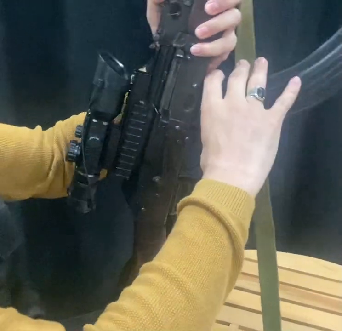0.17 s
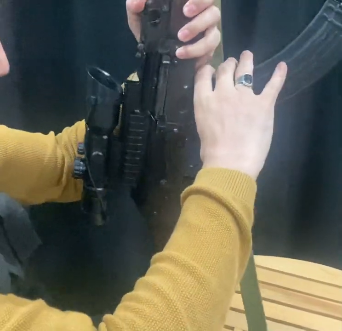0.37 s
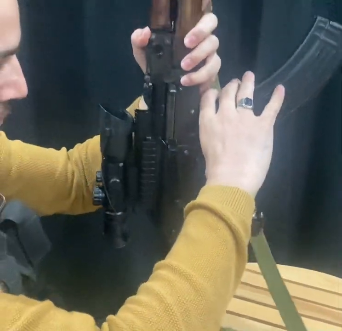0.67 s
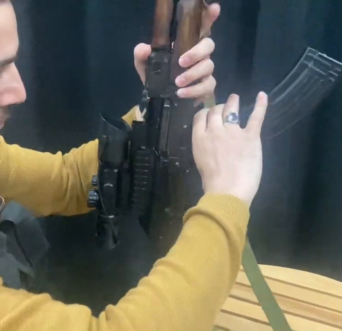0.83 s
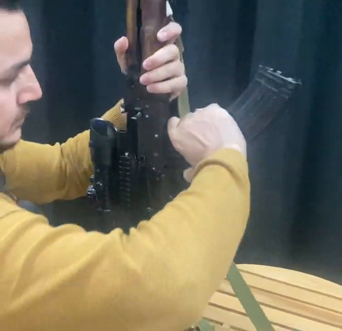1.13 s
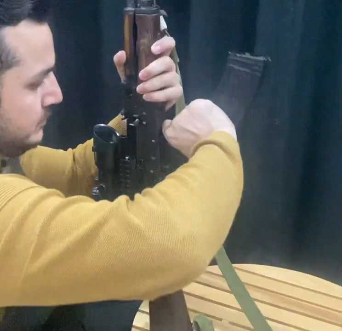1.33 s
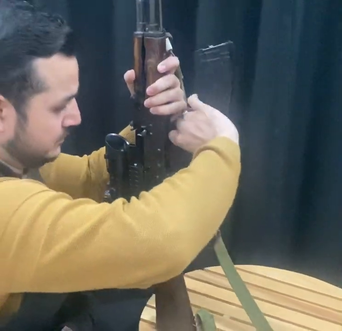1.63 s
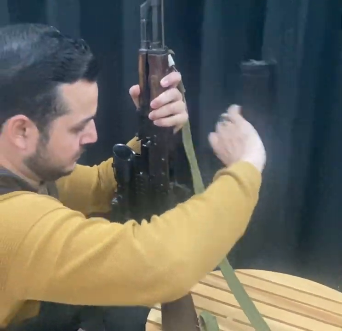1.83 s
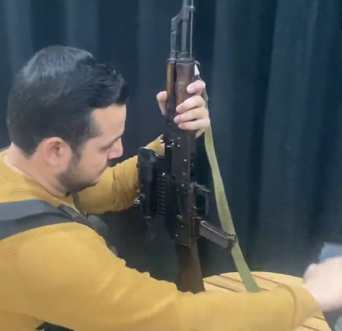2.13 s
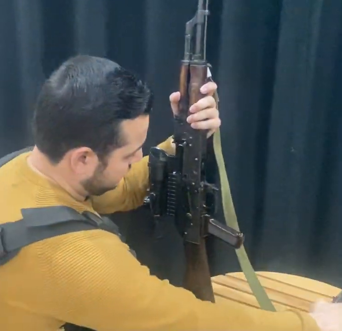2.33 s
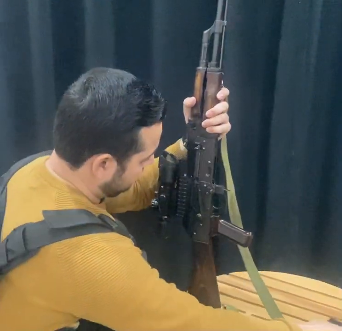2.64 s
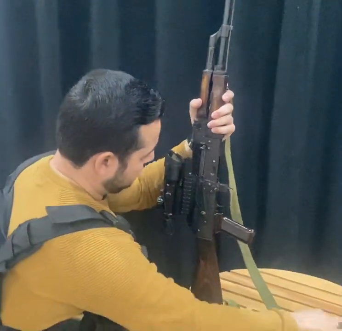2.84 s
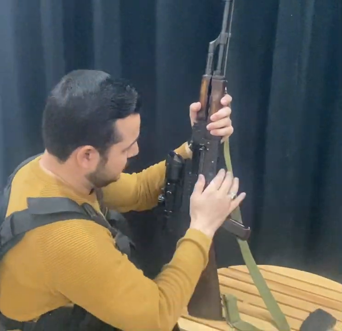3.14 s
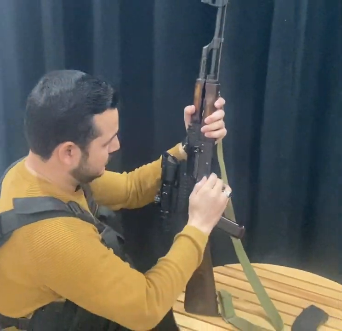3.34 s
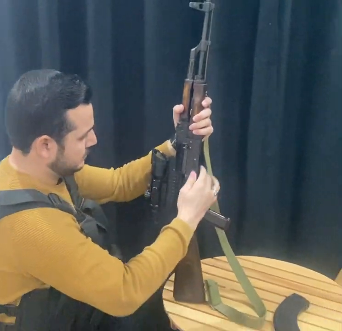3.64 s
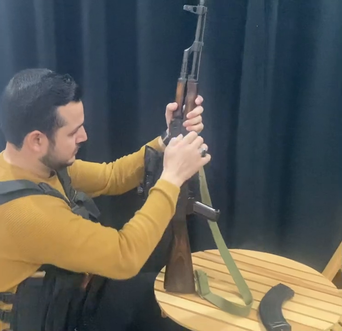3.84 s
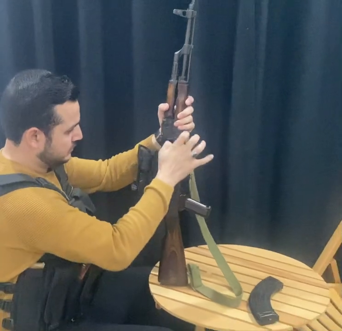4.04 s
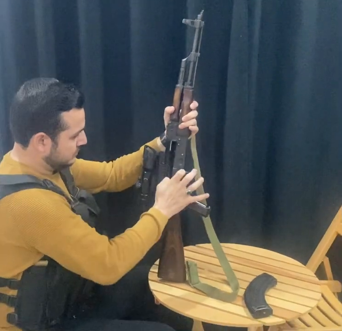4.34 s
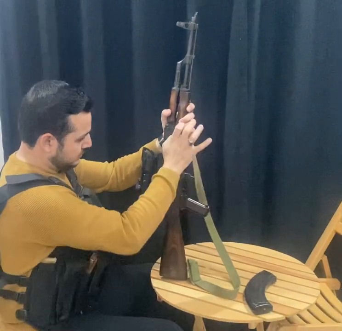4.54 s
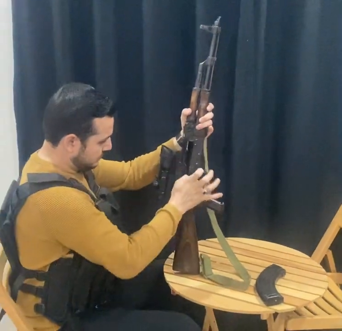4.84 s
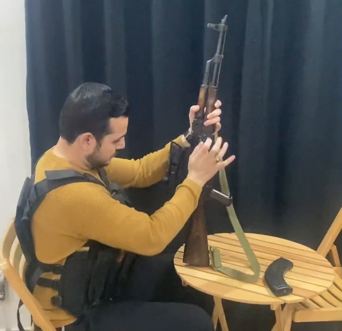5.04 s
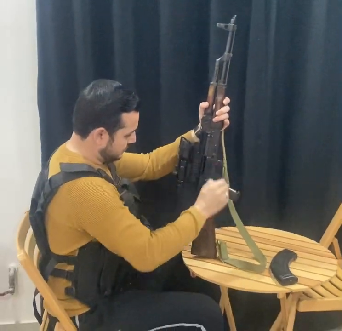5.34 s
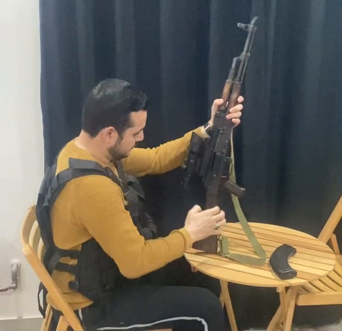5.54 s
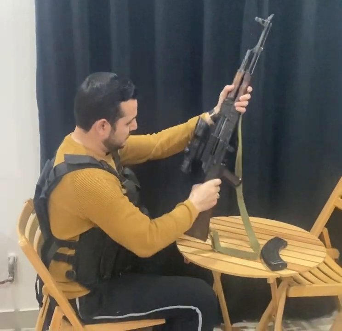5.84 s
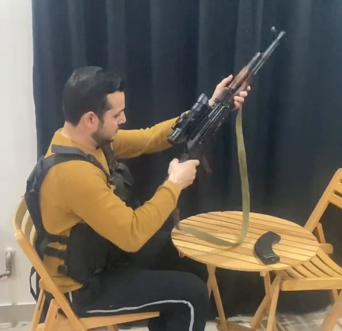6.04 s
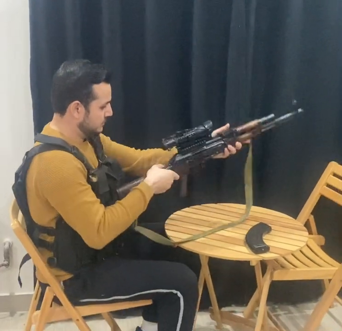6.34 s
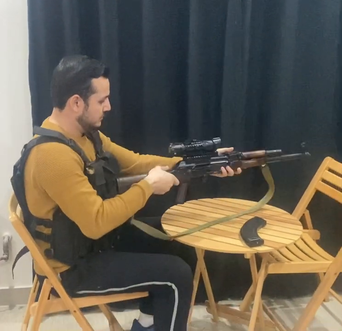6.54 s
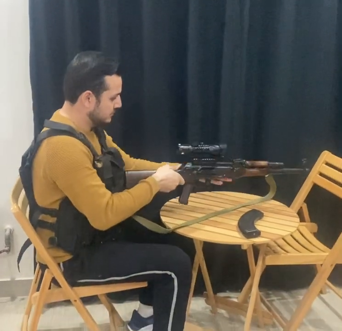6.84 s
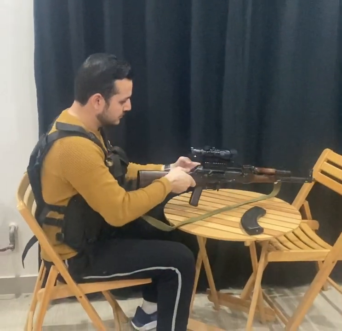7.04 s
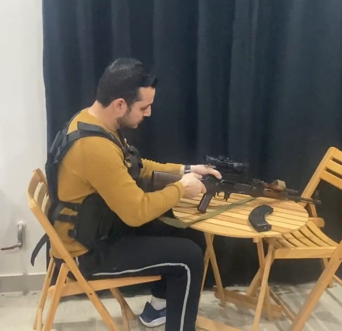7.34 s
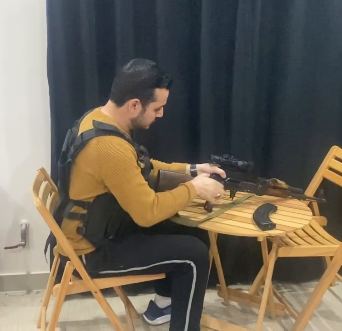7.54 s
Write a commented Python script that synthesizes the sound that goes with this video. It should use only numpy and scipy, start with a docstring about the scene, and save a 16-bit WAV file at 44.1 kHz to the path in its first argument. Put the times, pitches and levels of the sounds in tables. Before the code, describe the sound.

In a small, hard, lively room, a rifle is handled at a slatted wooden table. Faint metal ticks and sleeve rustle, a knock as the butt settles, dull magazine clunks, then the magazine is laid on wood. A crisp lever snap follows, then two loud scraping bolt pulls with ringing steel clacks, a scuff, and closing wooden knocks. Stereo microphone, slightly stronger on the left.

```python
"""In a small hard room, a rifle is cleared at a slatted wooden table.
The butt is stood on the table, the magazine unlatched and laid down, the safety lever snapped,
the bolt racked twice and the rifle lowered. Blows are short chatters of contacts that ring steel or wood;
slides, drags and the rustle of sleeves and sling are clumped, coloured grains. All but the room's
still air passes through echoes, whose level over the direct sound rises and falls through the scene."""
import sys
import numpy as np
from scipy import signal
from scipy.fft import rfft, irfft, next_fast_len
from scipy.io import wavfile

SR = 44100
rng = np.random.default_rng(int(sys.argv[2]) if len(sys.argv) > 2 else 0)


def wav_out(sig):
    """Save sig, one row per channel (or a flat mono array), as 16-bit PCM at SR to the path in sys.argv[1]."""
    wavfile.write(sys.argv[1], SR, np.round(np.clip(np.atleast_2d(sig).T, -1, 1) * 32767).astype(np.int16))


N = 339570
TIME = np.arange(N) / SR

# steel-on-steel blows with rebound: (time [s], level [dB], chatter [s], bass [dB], treble [dB],
# struck part's resonance [Hz], its gain [dB], rebound delay [s], rebound level re blow [dB])
STEEL_CLACKS = [ (.232, -39.5, .008, -3.5, -19.5, 4050, 4, 0.048, -10),
                (.635, -38, 0.0096, 3, -24.5, 1570, 8, 0.013, -5),
                (.783, -29.5, .013, 24, 1, 2000, 8, .014, -1),
                (1.268, -40.5, 0.0048, -22, 0, 920, 25, 0.012, -5),
                (1.286, -39, .005, -8, 6, 10600, -8, 0.014, -20),
                (1.357, -35, 0.0039, -2, 3, 2040, 13.5, 0.011, -8),
                (1.629, -47.5, .005, 6, -6, 1050, 20, .009, 12),
                (1.660, -35.5, .0065, 15, -7, 986, 20.5, .012, -12),
                (3.300, -55, .008, -9.5, -12.5, 1020, 20, 0.016, -8.5),
                (3.343, -19.5, 0.0013, -11, 3.5, 3550, 3, 0.0062, -12),
                (4.020, -30.5, 0.0073, -2, -4.5, 1011, 12.5, 0.045, -0.5),
                (4.111, -26, .008, -1.5, -1.5, 5320, 6, 0.014, -7.5),
                (4.166, -11, .0069, -6, 5, 2890, 4.5, .017, -3),
                (4.257, -11.5, .006, 1.5, -1, 1780, -0.5, .011, -5),
                (4.411, -31, .008, 2, 8, 1820, 0.5, .032, -3),
                (4.512, -8, .011, -5, 3, 4604, 2, .015, -2.5),
                (4.753, -19, 0.0083, -7.5, 5.5, 7280, 6.5, 0.0065, -9),
                (4.838, -13.5, .008, 2.5, -0.5, 1470, 4.5, 0.0071, -1),
                (5.030, -26, .008, 1, -6, 1150, 10, 0.011, 4),
                (5.047, -7, .0086, -2.5, 5.5, 3360, -0.5, 0.0079, -8.5),
                (5.809, -42, 0.028, 4, -6.5, 1300, 7, 0.052, -6)]
# magazine rocking in its well, damped by the hand: (time [s], level [dB], chatter [s], bass [dB],
# treble [dB], resonance [Hz], its gain [dB])
MAGAZINE_CLUNKS = [(0.992, -51, .002, -23, 17, 2010, 2), (1.042, -45, 0.00078, -7, -7, 1670, 2),
                   (1.328, -35.5, 0.0033, -11, 3, 960, 13), (1.490, -28, 0.0017, 5, 4.5, 1360, -1)]
# broad colour of the steel: (frequency [Hz], density [dB per Hz])
STEEL_SPECTRUM = [(35, -42), (80, -19.5), (130, -7.5), (230, -7), (330, -11), (540, -11), (700, -4),
                  (1000, -1.5), (2000, 3), (4700, 0), (6000, -5), (7200, -1.5), (8600, -9.5), (10200, 0.5),
                  (12000, -0.5), (16000, -8.5)]
# nominal ringing modes of the steel: (frequency [Hz], relative level [dB], t60 [s])
STEEL_RING = [(1088, -2.5, .14), (1120, -0.5, 0.14), (1492, -1, 0.18), (1763, -4, 0.13), (1890, -4, 0.6),
              (2130, 1.5, 0.17), (2460, -6, 0.092), (2750, 2, 0.31), (3010, -0.5, 0.15), (3630, -4, 0.069),
              (4120, -5.5, 0.15), (4030, -7, 0.22), (5020, 1.5, 0.33), (5240, -7, .16), (7520, -3, 0.25),
              (9740, 0, .12)]


def amp(db):
    """Decibels to gain."""
    return 10 ** (np.asarray(db) / 20)


def unit(x):
    """Scales to an energy of one."""
    return x / np.sqrt(np.sum(x ** 2) + 1e-20)


def read(points, hz):
    """Reads a spectrum on a log-frequency axis."""
    f, value = np.transpose(points)
    return np.interp(np.log(hz + 1), np.log(f + 1), value)


def follow(points):
    """Reads a time curve at every sample."""
    return np.interp(TIME, *np.transpose(points))


def add(mix, s, sound):
    """Mixes a sound in at time s."""
    part = mix[round(s * SR):][:len(sound)]
    part += sound[:len(part)]


def colour(points, size=4096):
    """Causal, minimum-phase impulse response with the given spectrum."""
    log_gain = np.log(amp(read(points, abs(np.fft.fftfreq(size, 1 / SR)))))
    response = np.exp(np.conj(signal.hilbert(log_gain)))
    return np.fft.ifft(response).real[:size // 2]


def tint(x, points):
    """Filters a sound by a spectrum."""
    return signal.oaconvolve(x, colour(points))[:len(x)]


def resonate(x, hz, width_hz):
    """A resonance with a peak gain of one."""
    return signal.lfilter(*signal.iirpeak(hz, hz / width_hz, fs=SR), x)


def grains(count, per_s, spread_db):
    """Tiny contacts of uneven size and random sign at random moments."""
    size = amp(spread_db * np.minimum(rng.exponential(1, count), 4))
    return size * rng.choice([-1, 1], count) * (rng.random(count) < per_s / SR)


def stroke(start_s, length_s, attack_s, release_s, swell_db):
    """Gain of one rubbing movement: it sets in, swells or sags while it lasts, and dies away."""
    t = TIME - start_s
    attack = np.clip(t / attack_s, 0, 1)
    swell = amp(swell_db * (np.clip(t / length_s, 0, 1) - .5))
    release = np.exp(-np.clip((t - length_s) / release_s, 0, 20))
    return attack * swell * release


def rub(spectrum, per_s, spread_db, lumpy_db, lump_s=0.01):
    """Friction at unit RMS: clumps of tiny slips, coloured by the thing that is rubbed."""
    knots_s = np.arange(N // 64) * lump_s
    pressure = amp(lumpy_db * np.interp(TIME, knots_s, rng.standard_normal(len(knots_s))))
    slips = grains(N, per_s, spread_db) * pressure
    return unit(tint(slips, spectrum)) * np.sqrt(N)


def strike(rows, spectrum, modes, ring_db, first_s, detune=0.025, width=0.12, size=16384):
    """Each blow is one hard contact and a short chatter of loose parts, which set the body ringing."""
    t, out = np.arange(size) / SR, np.zeros(N)
    hz, mode_db, t60_s = np.transpose(modes)[:, :, None]
    fades = amp(mode_db - 60 * t / t60_s)
    crack = unit(tint(signal.unit_impulse(size), spectrum))
    for s, level_db, chatter_s, bass_db, treble_db, part_hz, part_db in rows:
        contact = unit(grains(size, 12000, 3.6) * np.exp(-.5 * (t / chatter_s) ** 2))
        contact[0] += first_s / chatter_s  # the longer the chatter, the less its first contact stands out
        grip = 1 + detune * rng.standard_normal(hz.shape)  # hands and moving parts shift the modes
        ring = rng.choice([-1, 1], len(modes)) @ (fades * np.sin(2 * np.pi * hz * grip * t))
        hit = signal.fftconvolve(contact, crack + amp(ring_db) * unit(ring))[:size]
        hit = tint(hit, [(350, bass_db), (1500, 0.011), (2500, 0.0019), (9000, treble_db)])
        # the struck part lends its own broad resonance
        hit = hit + (amp(part_db) - 1) * resonate(hit, part_hz, width * part_hz)
        add(out, s, amp(level_db) * unit(hit) * np.sqrt(SR / 100))  # level as if packed into 10 ms
    return out


def rebounding(rows, longer, heavier_db, duller_db, body_hz, body_db):
    """Each blow makes two contacts; the second is longer, heavier and duller, and sounds the whole body."""
    contacts = []
    for s, level_db, chatter_s, bass_db, treble_db, part_hz, part_db, after_s, second_db in rows:
        contacts.append((s, level_db, chatter_s, bass_db, treble_db, part_hz, part_db))
        contacts.append((s + after_s, level_db + second_db, chatter_s * longer,
                         bass_db + heavier_db, treble_db - duller_db, body_hz, body_db))
    return contacts


def diffuse(pair):
    """Two unrelated signals become a diffuse field at two close ports: alike mainly in the bass."""
    # left-right correlation: (frequency [Hz], correlation [1])
    correlation = [(60, .985), (140, .965), (270, .8), (550, .28), (1200, 0), (3000, 0), (7000, .15),
                   (12000, -.1)]
    alike = read(correlation, np.fft.rfftfreq(pair.shape[1], 1 / SR))
    mid, side = rfft(pair) * np.sqrt([(1 + alike) / 2, (1 - alike) / 2])
    return irfft([mid + side, mid - side], pair.shape[1])


def walls(early_db=-3, build_s=0.0052, count=2400):
    """One set of echoes: a few near reflections, and a tail whose treble dies first."""
    # decay of the tail: (frequency [Hz], t60 [s])
    decay = [(100, 0.58), (260, .6), (700, 0.36), (1840, 0.39), (4850, 0.38), (12800, 0.26)]
    # colour of the echoes: (frequency [Hz], gain [dB])
    echo_spectrum = [(50, 3.5), (100, -0.5), (128, 6.5), (165, -1), (220, 0), (320, 0.5), (3000, 0.5),
                     (7000, 1.5), (12000, -6.5), (16000, -13)]
    taps, early = np.zeros((2, 2, count * 16))
    at = np.arange(count) * 16 + rng.integers(0, 16, (2, count))  # one tap in every 16 samples
    np.put_along_axis(taps, at, rng.choice([-1., 1.], at.shape), 1)
    hz, t, z = signal.stft(diffuse(taps), SR, nperseg=256)
    fade = amp(-60 * t / read(decay, hz)[:, None]) * (1 - np.exp(-t / build_s))
    tail = unit(signal.istft(z * fade, SR, nperseg=256)[1][:, :taps.shape[1]])
    near = rng.integers(SR // 2000, SR // 100, (2, 14))  # 0.5 to 10 ms
    np.put_along_axis(early, near, rng.uniform(-1, 1, near.shape), 1)
    echoes = np.sqrt(2) * unit(tail + amp(early_db) * unit(diffuse(early)))
    return np.array([tint(side, echo_spectrum) for side in echoes])


def room(x, lag_s=.000023, cycle_hz=23, count=3):
    """Direct sound at two ports, plus echoes that cycle through three random tails at a fixed rate."""
    # room over direct sound, rising and falling through the scene: (time [s], ratio [dB])
    echo_ratio = [(0, 5), (1.5, 1.5), (2.6, 9), (3.3, 5.5), (4.2, 2), (5, 2.5), (7.7, 9.5)]
    wet = amp(follow(echo_ratio))
    direct = x / np.hypot(1, wet)
    size = next_fast_len(N)
    # the right port is a little farther away
    later = np.exp(-2j * np.pi * np.fft.rfftfreq(size, 1 / SR) * lag_s)
    out = np.array([direct, irfft(rfft(direct, size) * later, size)[:N]])
    for k in range(count):
        # the squares sum to one and repeat at cycle_hz
        share = np.sqrt(2 / count) * np.cos(np.pi * (cycle_hz * TIME + k / count))
        out += signal.oaconvolve((direct * wet * share)[None], walls(), axes=1)[:, :N]
    return out


def hush(level_db=-68.5):
    """The still air of the room: steady, coloured, diffuse noise."""
    # (frequency [Hz], density [dB per Hz])
    air_spectrum = [(15, -34.5), (25, -7), (87, 4), (575, -10.5), (911, -6.5), (2160, -8), (5570, -22),
                    (7110, -18.5), (8590, -29), (11000, -19.5), (11900, -25.5), (13200, -53.5),
                    (16000, -51.5)]
    air = diffuse(np.array([tint(side, air_spectrum) for side in rng.standard_normal((2, N))]))
    return amp(level_db) * unit(air) * np.sqrt(2 * N)


def clothes(attack_s=0.036, release_s=0.017, swell_db=-6.5, rest_db=-76.5):
    """Each movement crumples the sleeves; vest and sling add a brighter swish."""
    # arm movements: (start [s], length [s], level [dB], swish re crumple [dB])
    movements = [(0.252, .20, -66, -17), (0.667, 0.34, -58, -5), (1.053, 0.26, -63.5, -1.5),
                 (1.218, 0.21, -55.5, -13), (1.677, 0.18, -58, -8), (1.85, 0.18, -63, -20),
                 (2.257, 0.081, -60.5, -23), (2.724, 0.29, -56, -13), (3.126, 0.071, -66, -9),
                 (3.277, .20, -58, -1), (5.718, 0.36, -65, 0), (6.149, 0.24, -65.5, 8),
                 (6.63, .25, -82, 12), (6.916, 0.25, -70.5, 3.5), (7.22, 0.54, -70, -9)]
    # colour of the cloth: (frequency [Hz], density [dB per Hz])
    cloth_spectrum = [(35, -36), (60, -2.5), (189, -0.5), (380, -6), (408, -3), (515, -5), (666, -3),
                      (842, -3.5), (4030, -13), (5590, -25), (11000, -24), (13600, -37.5), (16000, -38)]
    crumple = rub(cloth_spectrum, per_s=2500, spread_db=2.5, lumpy_db=6.5)
    swish = rub(cloth_spectrum, per_s=6400, spread_db=7.0, lumpy_db=5.5)
    swish = tint(swish, [(1500, -21.5), (6000, 4.5), (12000, 6)])
    moving = np.zeros(N)
    for s, length_s, level_db, swish_db in movements:
        effort = amp(level_db) * stroke(s, length_s, attack_s, release_s, swell_db)
        moving += effort * (crumple + amp(swish_db) * swish)
    return moving + amp(rest_db) * crumple  # between movements the cloth is almost still


def butt_drag(attack_s=0.016, release_s=0.03, swell_db=4):
    """The butt judders over the slats in two scuffs as it leaves the tabletop."""
    # (start [s], length [s], level [dB])
    scuffs = [(5.407, 0.05, -45.5), (5.531, 0.052, -53)]
    # (frequency [Hz], density [dB per Hz])
    scuff_spectrum = [(50, -14), (130, -0.5), (280, -2), (420, -10), (750, -13), (1100, -14), (1300, -4.5),
                      (1550, -11), (1900, -2), (2300, -14), (2850, -6), (3250, -22), (6000, -33),
                      (16000, -29)]
    push = sum(amp(level_db) * stroke(s, length_s, attack_s, release_s, swell_db)
               for s, length_s, level_db in scuffs)
    return push * rub(scuff_spectrum, per_s=1200, spread_db=-2.0, lumpy_db=-3.0)


def tabletop(thump_after_s=.012, thump_db=-13.5):
    """The table takes the rifle and the magazine, and thumps when the magazine rocks in the standing rifle."""
    # an edge lands, then the weight: (time [s], level [dB], chatter [s], bass [dB], treble [dB],
    # struck spot's resonance [Hz], its gain [dB], weight's delay [s], weight's level re blow [dB])
    landings = [ (.772, -22.5, 0.006, -1, 5.5, 3150, 5.5, .003, -2.5),
                (2.529, -34.5, 0.0099, 12, 2, 1100, 14.5, .014, -4),
                (2.570, -41.5, .025, 4.5, -8, 338, 10.5, 0.034, -7),
                (2.762, -23.5, 0.013, -7, 2, 2700, 1.5, .012, -4.5),
                (2.772, -26.5, 0.014, 3, -14.5, 217, 15, .012, -11.5),
                (5.436, -32, 0.0059, 35, -23, 172, 12, .018, -4.5),
                (6.200, -45.5, 0.0096, -5, -9, 1900, 11, .012, -11),
                (6.205, -46, 0.0088, -5, -8, 440, 22, .02, -15),
                (7.328, -39.5, .012, 10, 10, 436, 11.5, .012, -9),
                (7.349, -23, 0.0083, -5.5, 13, 2480, -8, .014, -1.5),
                (7.373, -17, 0.0078, -8.5, 9, 852, 12.5, .006, -14),
                (7.412, -28, 0.0044, -6, 1.5, 877, -2, .012, -7),
                (7.460, -36.5, 0.032, -4, 9, 398, 11.5, .03, -9)]
    # (frequency [Hz], density [dB per Hz])
    wood_spectrum = [(30, -49.5), (70, -8.5), (100, -4), (125, -2.5), (240, 4.5), (380, -7.5), (560, -3),
                     (900, -6), (1300, -4.5), (2200, -6), (3500, -11), (5500, -26.5), (8500, -36.5),
                     (11000, -33.5), (16000, -39)]
    # nominal: (frequency [Hz], relative level [dB], t60 [s])
    wood_ring = [(127.2, -12, 0.49), (203.1, -0.5, .3), (229.2, -7, 0.2), (252.3, -8.5, 0.78),
                 (326, 1.5, 0.32), (449.5, 0.5, 0.29), (930, 8.5, 0.14), (950, 1.5, 0.12),
                 (1574, -6.5, 0.14), (2160, 2.5, 0.31), (2730, -1.5, 0.23), (3010, -20, .1)]
    knocks = rebounding(landings, longer=1.23, heavier_db=5.5, duller_db=8.5, body_hz=211.5, body_db=5)
    # each clunk runs down the stock; chatter s, bass dB, treble dB, resonance Hz and its dB are shared
    thumps = [(s + thump_after_s, level_db + thump_db, 0.0086, 17, -18, 199, 25)
              for s, level_db, *_ in MAGAZINE_CLUNKS]
    return strike(knocks + thumps, wood_spectrum, wood_ring, ring_db=-11, first_s=0.0011, detune=.015)


def magazine_rock():
    """The magazine clunks in its well, with short, hand-damped modes."""
    # (frequency [Hz], density [dB per Hz])
    magazine_spectrum = [(60, -58.5), (220, -29), (350, -13.5), (550, 6.5), (900, 2.5), (1300, 5),
                         (1800, 8), (2050, -2.5), (3500, -21.5), (11000, -44), (16000, -52)]
    # nominal: (frequency [Hz], relative level [dB], t60 [s])
    magazine_ring = [(704, 17, 0.028), (1310, -4, .04), (1750, -24, .2)]
    return strike(MAGAZINE_CLUNKS, magazine_spectrum, magazine_ring, ring_db=-23, first_s=0.0011)


def bolt_slide(ring_db=-12, ring_t60_s=0.041, split_hz=3800, attack_s=.008, release_s=.03, swell_db=2.5):
    """The carrier grinds and hisses along the rails, gathers speed and keeps the receiver ringing."""
    # back and forward twice, then a creep: (start [s], length [s], level [dB], hiss re grind [dB])
    runs = [(4.013, .15, -34.5, 1.5), (4.167, .09, -28, -0.5), (4.394, 0.14, -29.5, 0),
            (4.672, 0.17, -31, 2.5), (4.945, .10, -31.5, 1), (5.168, 0.14, -45.5, -1)]
    t = np.arange(SR // 8) / SR
    ring = unit(sum(amp(db - 60 * t / ring_t60_s) * np.sin(2 * np.pi * hz * t) for hz, db, _ in STEEL_RING))
    body = unit(signal.unit_impulse(len(t)) + amp(ring_db) * ring)
    grind = rub(STEEL_SPECTRUM, per_s=900, spread_db=4.0, lumpy_db=5.5)
    grind = tint(grind, [(60, -1), (170, 3), (500, -2), (800, -2), (1020, 2), (1400, 0),
                         (split_hz, -3), (9000, -14)])
    hiss = rub(STEEL_SPECTRUM, per_s=2400, spread_db=4.5, lumpy_db=2.5)
    hiss = tint(hiss, [(1200, -20), (split_hz, -3), (7000, 0), (11000, 1), (15000, -4)])
    friction = np.zeros(N)
    for s, length_s, level_db, hiss_db in runs:
        push = amp(level_db) * stroke(s, length_s, attack_s, release_s, swell_db)
        friction += push * (grind + amp(hiss_db) * hiss)
    return signal.oaconvolve(friction, body)[:N]


def free_part():
    """A free steel part: a thin ring of decaying sines that outlasts the first clack."""
    # (frequency [Hz], level [dB], t60 [s])
    free_ring = [(1626, -55, 0.76), (3278, -58, .4), (4060, -54, 0.17)]
    t = np.maximum(TIME - STEEL_CLACKS[0][0], 0)
    return sum(amp(db - 60 * t / t60_s) * np.sin(2 * np.pi * hz * t) for hz, db, t60_s in free_ring)


def steel_parts():
    """Latch, safety lever and bolt clack and rebound; small fittings tick under the fingers."""
    # (time [s], level [dB], treble [dB])
    fittings = [(0.024, -62.5, -1), (.108, -54, -50), (0.222, -51, -12), (.528, -61, -35), (.695, -51, 8),
                (0.736, -55, 12), (1.041, -48, 10), (3.955, -64.5, -20), (6.012, -56, 17),
                (6.690, -61.5, -17), (6.932, -59.5, -9), (7.160, -59, -19)]
    clacks = rebounding(STEEL_CLACKS, longer=1.4, heavier_db=2.5, duller_db=2.5, body_hz=1000, body_db=4.5)
    # all ticks share chatter s, bass dB, resonance Hz and its dB
    ticks = [(s, level_db, 0.0015, -7, treble_db, 1714, 8) for s, level_db, treble_db in fittings]
    return strike(clacks + ticks, STEEL_SPECTRUM, STEEL_RING, ring_db=-21.0, first_s=0.00043)


def scene():
    """All handling sounds pass through the same room, louder on the left."""
    rubbing = clothes() + butt_drag() + bolt_slide()
    blows = tabletop() + magazine_rock() + free_part() + steel_parts()
    return hush() + room(rubbing + blows) * amp([[1.9], [1.3]])


def record(dry, edge_hz=16400):
    """The microphone has a notch high in the treble; the loudest peaks round off; then the band limit."""
    # (frequency [Hz], gain [dB])
    mic_response = [(20, -2.5), (11900, 0.5), (12600, -4), (13350, -30), (14000, -7), (15500, 0),
                    (16500, -8.5)]
    heard = np.tanh([tint(side, mic_response) for side in dry])
    band_limit = signal.firwin(511, edge_hz, window=("kaiser", 9), fs=SR)
    return signal.oaconvolve(heard, band_limit[None], "same")


dry = scene()
out = record(dry)
wav_out(out)
```